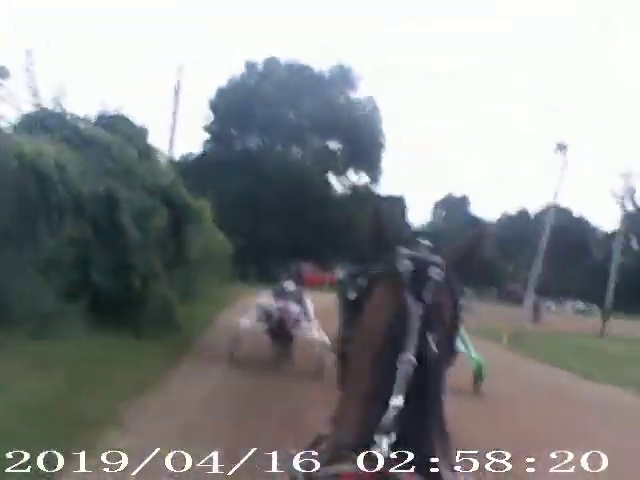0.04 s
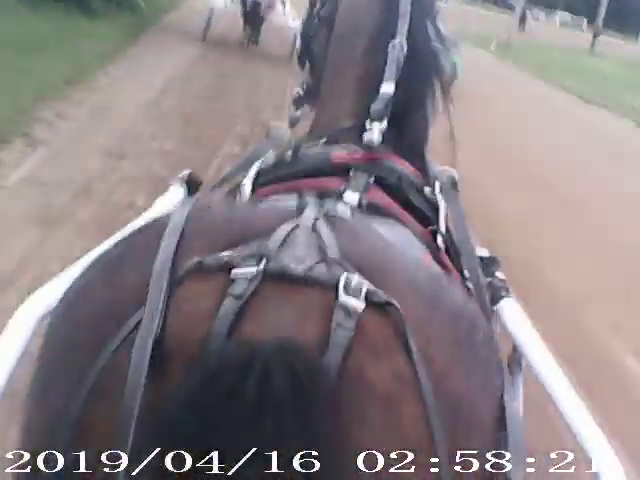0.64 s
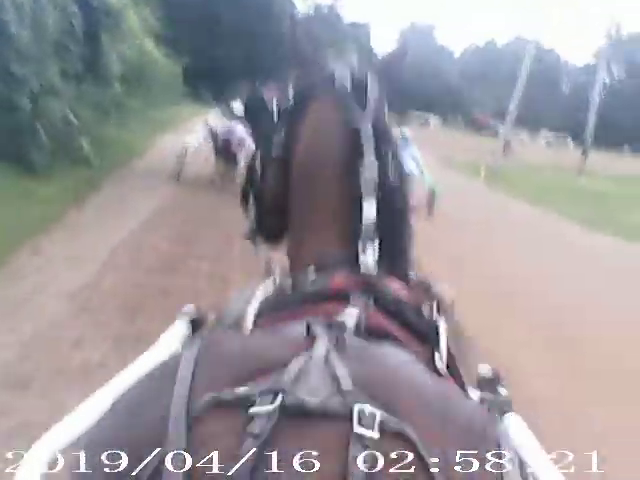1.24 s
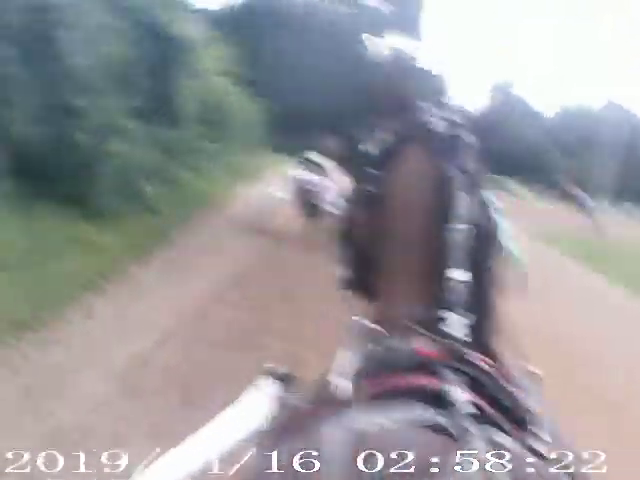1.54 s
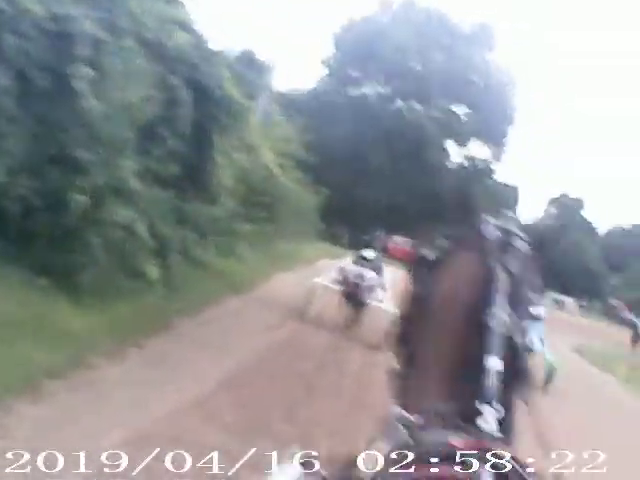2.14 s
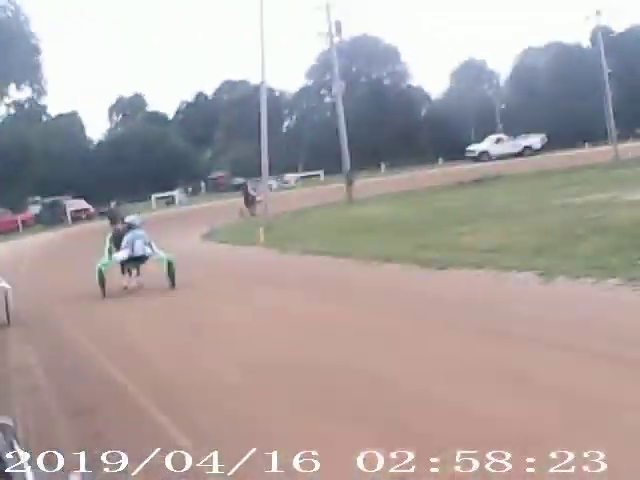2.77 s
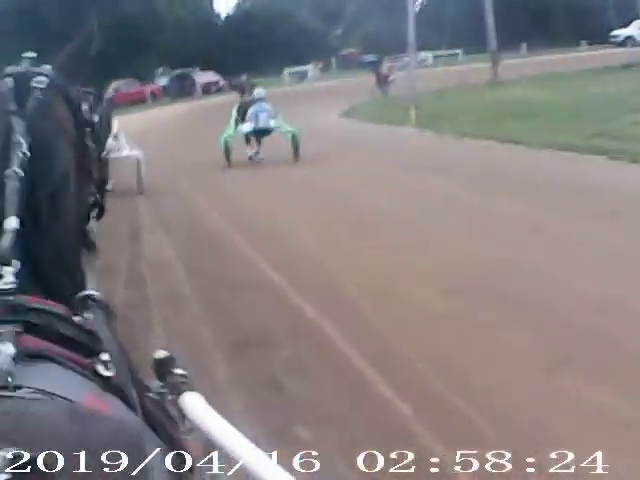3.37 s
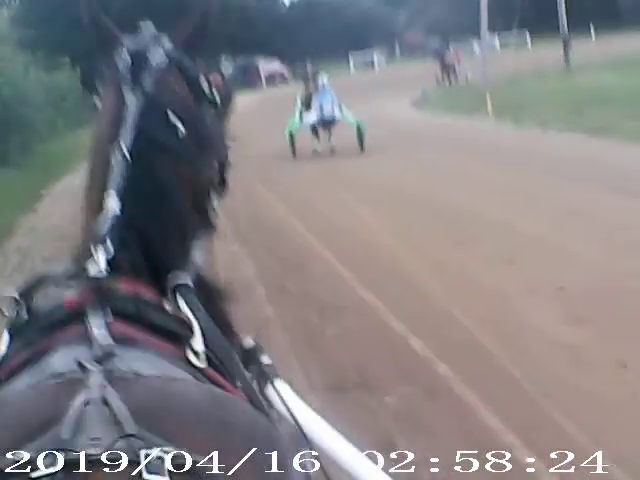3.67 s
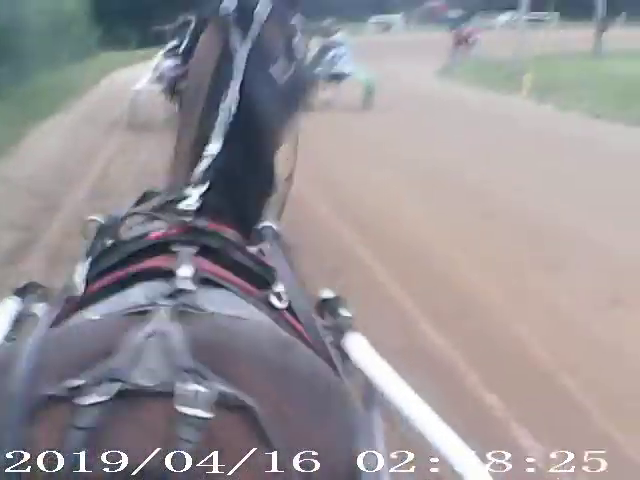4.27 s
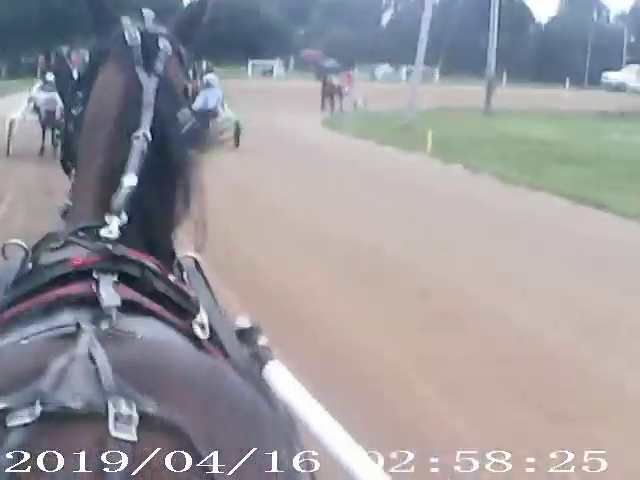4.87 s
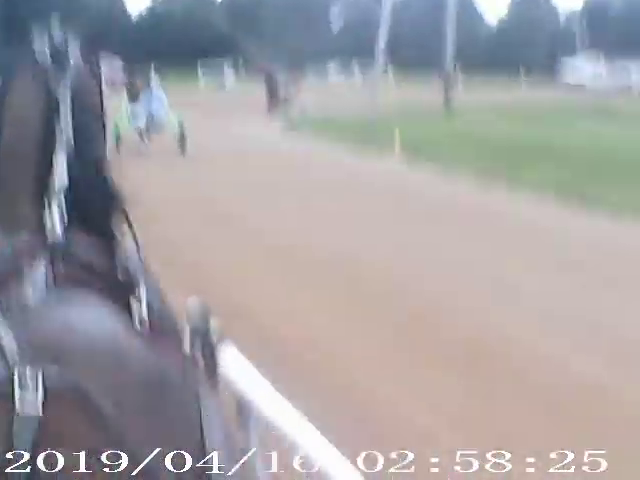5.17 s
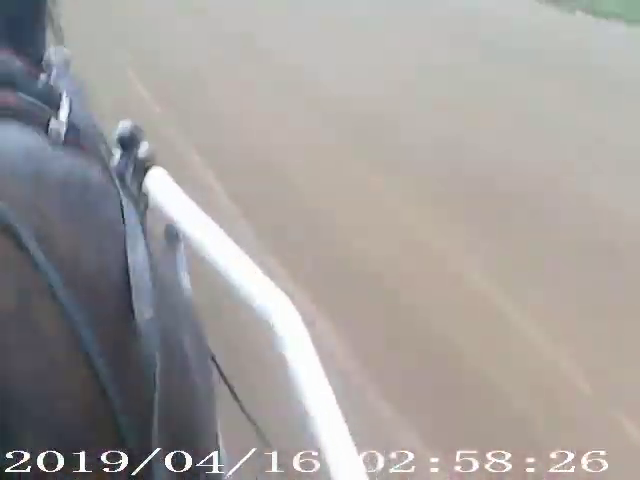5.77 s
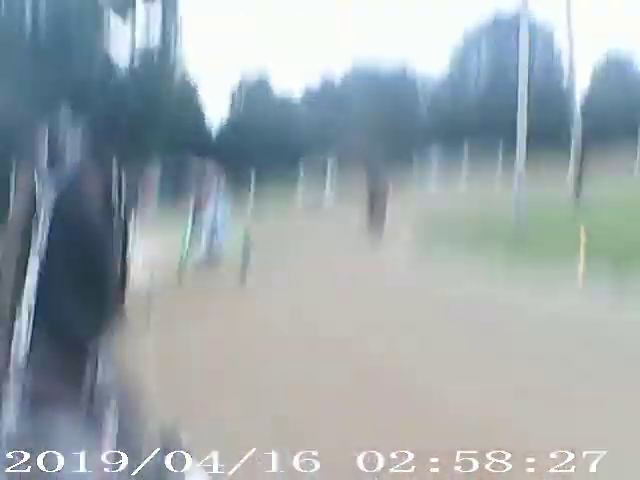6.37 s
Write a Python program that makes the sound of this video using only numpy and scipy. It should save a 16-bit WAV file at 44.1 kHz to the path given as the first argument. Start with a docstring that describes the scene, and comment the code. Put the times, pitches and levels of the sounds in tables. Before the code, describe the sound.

A horse's hooves crunch along a dirt track with rattling harness, while cart jolts knock heavily on the microphone.

```python
"""A horse's hooves crunch into a dirt track as it jogs, and its harness rattles.
We listen from a small camera on the two-wheeled cart behind it. Each hoofbeat is a short ringing clack
plus a burst of noise for the crushed grit. Underneath, the tyres hiss, clods and buckles patter, and
the springy cart frame hums and booms on bumps. In three bouts the jolting knocks heavily on the
microphone, with dull rubbing in between."""
import sys
import numpy as np
from scipy import signal
from scipy.fft import rfft, irfft
from scipy.io import wavfile
from scipy.ndimage import uniform_filter1d

SR = 44100
rng = np.random.default_rng(int(sys.argv[2]) if len(sys.argv) > 2 else 0)


def bounce(signal):
    """Save signal as a 16-bit WAV file at the path given by the first command-line argument."""
    frames = np.transpose(np.atleast_2d(signal))
    limited = np.clip(frames, -1, 1)
    pcm = np.round(limited * 32767).astype(np.int16)
    wavfile.write(sys.argv[1], SR, pcm)


N = 291501
T = np.arange(N) / SR
HZ = np.fft.rfftfreq(N, 1 / SR)


def amp(db):
    """Turns decibels into a number to multiply by."""
    return 10 ** (np.asarray(db) / 20)


def unit(x):
    """Scales a sound to an average strength (rms) of 1."""
    return x / np.sqrt(np.mean(x ** 2) + 1e-20)


def spectrum(points):
    """Joins (f/Hz, level/dB) points into a gain for every frequency."""
    hz, db = np.transpose(points)
    return amp(np.interp(np.log(HZ + 1), np.log(hz), db))


def colour(x, gain):
    """Turns each frequency of a sound up or down by its gain."""
    return irfft(rfft(x) * gain, N)


def wander(rate_hz):
    """A smooth random wobble; a higher rate makes it quicker."""
    return unit(colour(rng.standard_normal(N), 1 / (1 + (HZ / rate_hz) ** 4)))


def swell(start, end, rise_s, dies_s):
    """Fades in from start, holds until end, then dies away."""
    return np.clip((T - start) / rise_s, 0, 1) * np.exp(-np.maximum(T - end, 0) / dies_s)


def swing(t, hz, cycles):
    """A vibration that starts at t = 0 and fades to about a third after that many cycles."""
    after = np.maximum(t, 0)
    return np.sin(2 * np.pi * hz * after) * np.exp(-after * hz / cycles)


def add(mix, s, sound):
    """Mixes a sound in, starting at s seconds."""
    start = round(s * SR)
    sound = sound[max(-start, 0):]
    part = mix[max(start, 0):][:len(sound)]
    part += sound[:len(part)]


# How the rolling grows louder and softer: t/s, level/dB
ROLL_LEVELS = [(0.0, -61), (0.6, -56), (1.47, -58), (1.75, -55.5), (1.99, -62.5), (2.52, -60), (3.09, -60),
               (4.01, -55), (4.45, -58.5), (4.69, -54.5), (5.13, -54.5), (5.57, -59.5), (5.97, -54.5),
               (6.6, -63.5)]
# The tone of the cart frame's low hum under a faint hiss: f/Hz, level/dB
BACKGROUND_TONE = [(20, -8), (38, 8), (56, 17), (80, 3), (130, 3), (330, 2.5), (480, 0.5), (900, -3),
                   (1600, -9), (2700, -11.5), (5000, -12.5), (6500, -10), (7200, -20.5)]
# The tone of loose grit, for the tyres and the patter: f/Hz, level/dB
GRIT_TONE = [(100, -17), (500, -6.5), (1100, -4), (1900, 5), (2700, -3), (4500, -1), (7000, -4.5)]


def tyres(gain_db=-6, background_db=-56, flutter_db=1, grain_db=5.5):
    """Tyres roll over uneven grit, above a steady low hum of the cart frame and a faint hiss."""
    level = amp(np.interp(T, *np.transpose(ROLL_LEVELS)) + gain_db + flutter_db * wander(11))
    grains = rng.standard_normal(N) * amp(grain_db * wander(500))
    rolling = level * unit(colour(grains, spectrum(GRIT_TONE)))
    background = amp(background_db) * unit(colour(rng.standard_normal(N), spectrum(BACKGROUND_TONE)))
    return rolling + background


def patter(hits_per_band_s=50, level_db=-66, dies_s=.013, spread_db=1.5):
    """Small clods and buckles patter at random, as tiny bursts of noise in two high bands."""
    out = np.zeros(N)
    for band_hz in (1100, 2600), (2800, 4700):
        hits = rng.random(N) < hits_per_band_s / SR
        sizes = amp(spread_db * np.clip(rng.standard_normal(N), -2, 1))
        fades = signal.lfilter([1], [1, -np.exp(-1 / (dies_s * SR))], hits * sizes)
        band = signal.butter(2, band_hz, "band", fs=SR)
        out += signal.lfilter(*band, fades * rng.standard_normal(N))
    return amp(level_db) * unit(colour(out, spectrum(GRIT_TONE)))


# Bumps in the track, for the frame and the rubbing: t/s, boom level/dB, rubbing level/dB
TRACK_BUMPS = [(0.64, -47, -60), (0.751, -53, -45), (1.089, -55, -50.5), (1.24, -54, -52),
               (1.429, -50, -63), (2.19, -67, -49.5), (2.489, -60, -43.5), (2.576, -45.5, -49.5),
               (2.862, -57, -60), (3.072, -49.5, -41), (3.428, -53, -60), (3.948, -49, -55),
               (4.231, -38, -40), (4.57, -45, -43.5), (4.77, -46.5, -40.5), (4.929, -42, -48.5),
               (5.137, -41.5, -51.5), (5.301, -49.5, -53), (5.58, -61, -53), (5.893, -44, -52)]


def cart_frame(boom_hz=55.6, rise_s=.015, dies_s=.087):
    """Each bump sets the springy frame swinging and cuts off the swing before it."""
    out = np.zeros(N)
    for s, db, _ in TRACK_BUMPS:
        t = np.maximum(T - s, 0)
        rise = 1 - np.exp(-t / rise_s)
        boom = 2 * amp(db) * np.exp(-t / dies_s) * np.sin(2 * np.pi * boom_hz * t)
        out = out * (1 - rise) + boom * rise
    return out


# Steady rubbing during the knocking: start t/s, end t/s, level/dB
RUB_SPELLS = [(0, 0.432, -57.5), (0.576, 0.616, -39.5), (1.74, 1.873, -41.5), (5.054, 5.13, -38.5)]
# The dull tone of the rubbing: f/Hz, level/dB
RUB_TONE = [(15, 3), (35, 6), (60, -1.5), (90, 2), (160, -9.5), (340, -6.5), (520, -17), (1000, -29.5),
            (3000, -37.5)]


def rubbing(gain_db=-2, rest_db=-63, lumps_db=4, bump_rise_s=.022):
    """Lumpy rubbing by the microphone swells on each bump and holds during bouts of knocking."""
    level = amp(rest_db)
    for s, _, db in TRACK_BUMPS:
        level = level + amp(db) * swell(s, s + bump_rise_s, bump_rise_s, dies_s=.045)
    for start, end, db in RUB_SPELLS:
        level = level + amp(db) * swell(start, end, rise_s=.012, dies_s=.026)
    lumps = rng.standard_normal(N) * amp(lumps_db * wander(26))
    return amp(gain_db) * level * unit(colour(lumps, spectrum(RUB_TONE)))


# Jolts that hit the microphone: t/s, level/dB, swing f/Hz, ring length/cycles, muffled above f/Hz
JOLTS = [(.008, -22.5, 164, 1.04, 705), (.063, -33.5, 124, 1.1, 600), (.159, -28.5, 61, 0.53, 500),
         (0.1873, -28, 158, 1.2, 597), (0.2441, -26.5, 163, 0.93, 600), (.293, -10.5, 60.5, 0.43, 1100),
         (0.3476, -11.5, 52.6, 0.28, 700), (.386, -14.5, 236, 0.4, 2680), (.3897, -25, 564, 0.65, 1500),
         (0.4576, -22, 100, 0.53, 880), (.476, -9.5, 139, 0.24, 1500), (0.5872, -30.5, 430, 1.4, 2500),
         (0.597, -25, 36, .53, 300), (0.6182, -10, 141, 0.35, 550), (1.283, -37, 130.6, 1.1, 700),
         (1.701, -29, 90, .4, 500), (1.7288, -9, 98, 0.29, 800), (1.7765, -26, 140, 0.78, 795),
         (1.8447, -13.5, 107, 0.23, 497), (1.882, -10.5, 170, 0.35, 600), (1.890, -23.5, 171, .6, 590),
         (2.5443, -28.5, 155, .5, 900), (2.582, -29.5, 248, 0.6, 900), (3.5725, -18, 214, 0.11, 650),
         (4.604, -35.5, 192, .4, 900), (5.027, -32.5, 282, .54, 900), (5.045, -25.5, 236, 1.7, 700),
         (5.056, -29.5, 417, 2.2, 800), (5.0643, -23.5, 513, 0.65, 3800), (5.074, -22, 35.2, 1.3, 400),
         (5.1086, -6, 253, 0.34, 3700), (5.1116, -1.7, 156, 0.19, 730), (5.219, -30, 280, 0.25, 900),
         (5.282, -30, 126, 0.49, 900), (5.365, -32, 218, 0.25, 900), (6.535, -37, 155, 0.56, 600)]


def microphone_knocks(build_db=-17, build_s=.012, rebound_db=-13.5, rebound_cycles=.557,
                      rebound_ratio=2.58, snap_db=-7, snap_s=.0007, full_snap_hz=4000):
    """Pressure builds, lets go at once, swings and strikes again, weaker and higher; hard edges snap."""
    out = np.zeros(N)
    t = np.arange(-SR // 20, SR // 8) / SR  # the knock lets go at t = 0
    for s, db, hz, cycles, edge_hz in JOLTS:
        build = -amp(build_db) * np.exp(-abs(t) / build_s) * (t < 0)
        rebound = -amp(rebound_db) * swing(t - rebound_cycles / hz, hz * rebound_ratio, cycles)
        hardness = min(edge_hz / full_snap_hz, 1)
        snap = amp(snap_db) * hardness * np.exp(-abs(t) / snap_s) * (t >= 0)
        knock = build + swing(t, hz, cycles) + rebound + snap
        muffle = signal.butter(2, edge_hz, fs=SR)
        add(out, s + t[0], amp(db) * signal.lfilter(*muffle, knock))
    return out


def soft_footfalls(stride_s=.556, first_s=-.012, lags_s=(.14, .36), loose_s=.015, uneven_db=2,
                   level_db=-49, treble_db=-11, clack_hz=1525, clack_db=-12):
    """Softer hoof steps fall twice a stride, never quite alike; gives rows like HOOFBEATS."""
    times = [s + lag for s in np.arange(first_s, N / SR, stride_s) for lag in lags_s]
    chance = rng.uniform(-1, 1, (len(times), 3))
    return [(s + loose_s * late, level_db + uneven_db * loud, treble_db + uneven_db * bright,
             clack_hz, clack_db) for s, (late, loud, bright) in zip(times, chance)]


# Hoofbeats and harness rattles: t/s, level/dB, treble change/dB, clack f/Hz, clack change/dB
HOOFBEATS = [(0.0136, -45.5, -3.5, 2040, -2), (0.209, -44.5, -13, 2030, -1),
             (.2897, -37.5, -9.5, 2030, -11), (0.5433, -37.5, -9, 2020, -11), (.588, -39, -15, 1420, -14),
             (0.6616, -40.5, -16, 1500, -12), (0.7636, -39, -6, 2017, -6), (.815, -36, -13, 1490, -18),
             (1.048, -41.5, -12, 2055, -5), (1.1007, -35.5, -9.5, 1860, -12), (1.26, -45.5, -3, 3850, 0.5),
             (1.641, -33.5, -11.5, 2046, -6), (2.186, -41.5, -10.5, 1840, -3),
             (2.3306, -44.5, -8, 1566, -3.5), (2.519, -42.5, -9, 1490, -10),
             (2.5665, -41.5, -13, 1474, -19), (2.7705, -42.5, -9, 1540, -6), (2.806, -42, -8, 1880, -2),
             (2.8968, -48, -1.5, 1440, -5), (2.987, -44, -6, 1900, -13), (3.1154, -42.5, -13, 1520, -22),
             (3.3155, -37, -8, 1950, -3), (3.3275, -39, -18, 2010, -13), (3.503, -46, -2.5, 1910, -4),
             (3.6364, -41, -15, 1960, -8), (3.6917, -37, -12.5, 1526, -18), (3.8924, -35, -8, 2044, -7.5),
             (3.927, -41.5, -16, 4380, -2), (4.0402, -44.5, -13, 1410, -2),
             (4.1155, -39.5, -10.5, 1990, -12), (4.159, -41, -7, 2320, -2.5),
             (4.2021, -38.5, -8.5, 1530, -22), (4.2322, -36.5, -11, 2050, -6), (4.2606, -41, -6, 1530, -11),
             (4.435, -35, -5, 4360, -4), (4.567, -37, -15, 2040, -8), (4.6556, -35, -23, 1420, -24),
             (4.777, -39, -14, 1895, -9), (4.8276, -38, -18, 1570, -10), (4.8583, -42.5, 1, 3000, -4),
             (5.003, -37, -12, 1880, -21), (5.0608, -33.5, -17, 1880, -10), (5.127, -38, -12, 1510, -14),
             (5.2366, -39, -11, 1917, -5), (5.2859, -36.5, -13, 2400, -4.5), (5.538, -35, -11.5, 1970, -17),
             (5.761, -44, -9, 3840, -6), (5.8002, -40, -8.5, 1940, -5), (6.1104, -33.5, -9.5, 1906, 1.5),
             (6.296, -40, -5, 2050, -16)]
# The tone of the crunch in each beat: f/Hz, level/dB
HOOF_TONE = [(100, -21), (500, -6.5), (1100, -7), (1900, 2), (2700, -4.5), (4400, 3), (5200, -14.5),
             (6400, 0.5), (7200, -18.5)]


def hooves_and_harness(crunch_db=-3.5, treble_db=3, treble_hz=2900, patchy_db=10, crunch_s=.012,
                       dirt_db=-14, dirt_s=.058, clack_db=-5, clack_s=.0089, upper_db=-5,
                       upper_ratio=1.19, rise_s=.0016, lag_s=.000998):
    """Each beat rings a short hard clack and crushes a burst of grit; thrown dirt trails after it."""
    out = np.zeros(N)
    t = np.arange(SR // 4) / SR
    freqs = np.fft.rfftfreq(len(t), 1 / SR)
    treble = 1 - 1 / (1 + (freqs / treble_hz) ** 8)  # 0 for low sounds, 1 for high ones
    base_tone = np.interp(freqs, HZ, spectrum(HOOF_TONE))
    rise = 1 - np.exp(-t / rise_s)
    for s, db, bright_db, hz, ring_db in list(HOOFBEATS) + soft_footfalls():
        # no two blows land alike: each gets random peaks and dips in its tone
        patches = np.interp(freqs, np.linspace(0, SR / 2, 100), rng.uniform(-1, 1, size=100))
        tone = base_tone * amp(treble * (bright_db + treble_db) + patchy_db * patches)
        grit = irfft(rfft(rng.standard_normal(len(t))) * tone, len(t))
        grind_s = crunch_s * 2 ** ((db + 40) / 15)  # a beat 15 dB harder grinds twice as long
        fade = np.exp(-t / grind_s) + amp(dirt_db) * np.exp(-t / dirt_s)
        crunch = amp(crunch_db) * fade * grit
        # two close pitches ring together and make the clack rough
        ring = np.sin(2 * np.pi * hz * t) + amp(upper_db) * np.sin(2 * np.pi * hz * upper_ratio * t)
        clack = amp(clack_db + ring_db) * np.exp(-t / clack_s) * ring
        add(out, s + lag_s, amp(db) * rise * (crunch + clack))
    return out


# Pitches at which the camera's case rings: f/Hz, width/Hz, boost/dB
CASE_RINGS = [(638, 20, 7.5), (1226, 65, 6), (1508, 57, 10.5), (1973, 90, 7.5), (2357, 72, 6),
              (2994, 150, 4.5), (3780, 110, 4.5), (4380, 52, 3.5), (6670, 120, -0.5)]


def camera_case(x):
    """The case rings briefly at its own pitches, so sounds passing through it turn hollow."""
    for hz, width, db in CASE_RINGS:
        ring = signal.lfilter(*signal.iirpeak(hz, hz / width, fs=SR), x)
        x = x + (amp(db) - 1) * ring
    return x


def scene():
    """Track sounds pass through the camera's case; cart sounds come straight through its mount."""
    track = camera_case(hooves_and_harness() + patter() + tyres())
    cart = microphone_knocks() + cart_frame() + rubbing()
    return (track + cart)[None]


def record(dry, choke_s=(5.1, 5.1086), ceiling_db=-7.8, top_hz=7080):
    """A cheap microphone chokes just before the heaviest knock, rounds off peaks and loses the highs."""
    choked = (T > choke_s[0]) * (T < choke_s[1])
    live = uniform_filter1d(1. - choked, size=31)  # a brief silence with softened edges
    rounded = dry / (1 + (dry / amp(ceiling_db)) ** 4) ** .25
    cut_highs = signal.firwin(191, top_hz, window=("kaiser", 7), fs=SR)
    return signal.oaconvolve(live * rounded, cut_highs[None], "same")


dry = scene()
out = record(dry)
bounce(out)
```